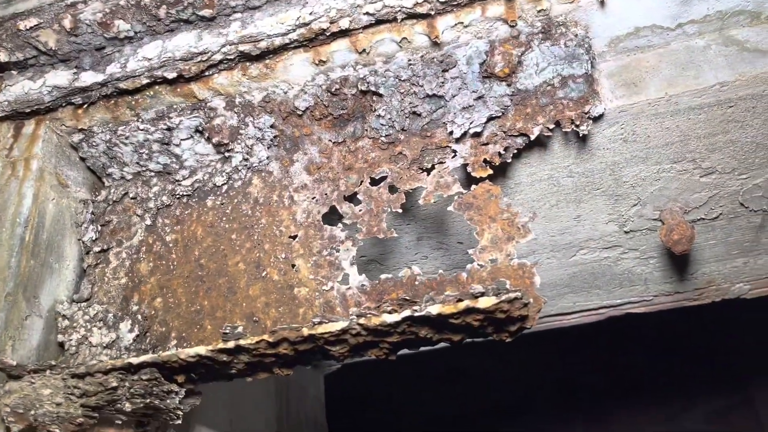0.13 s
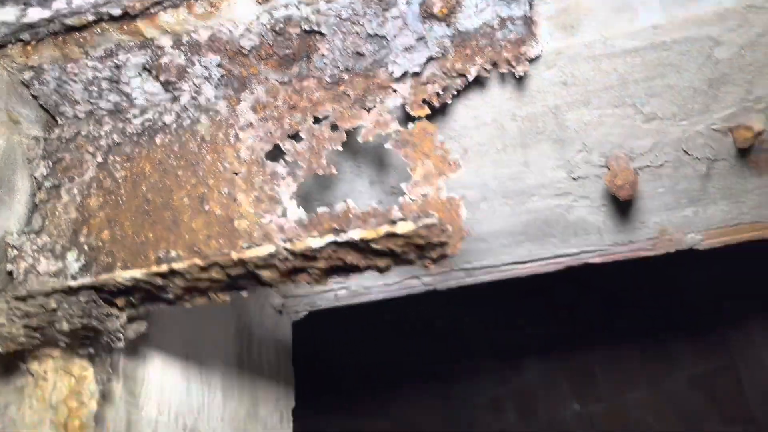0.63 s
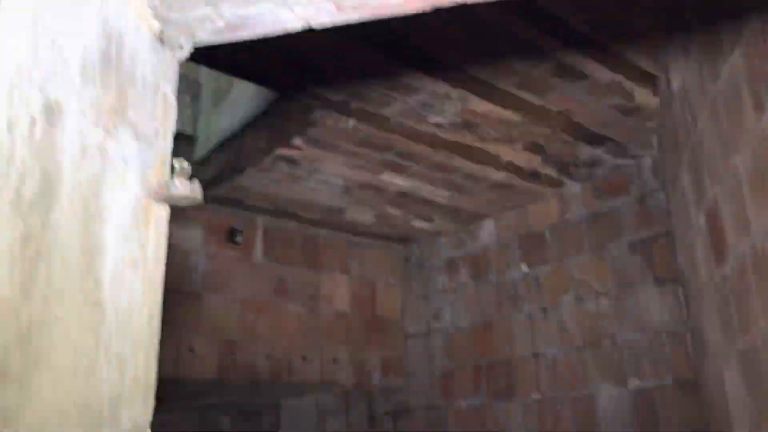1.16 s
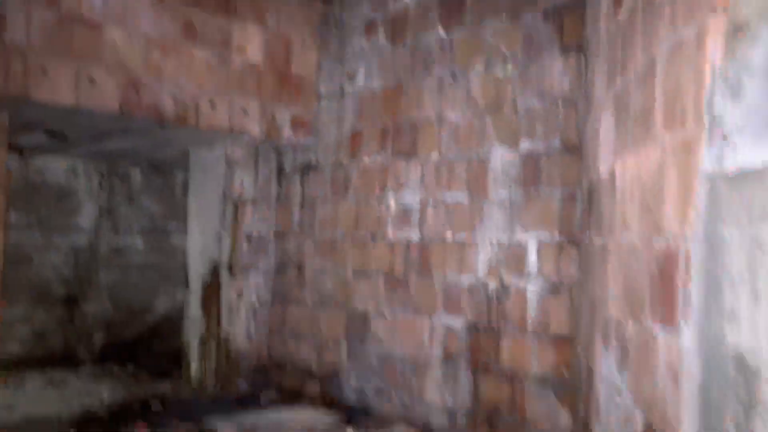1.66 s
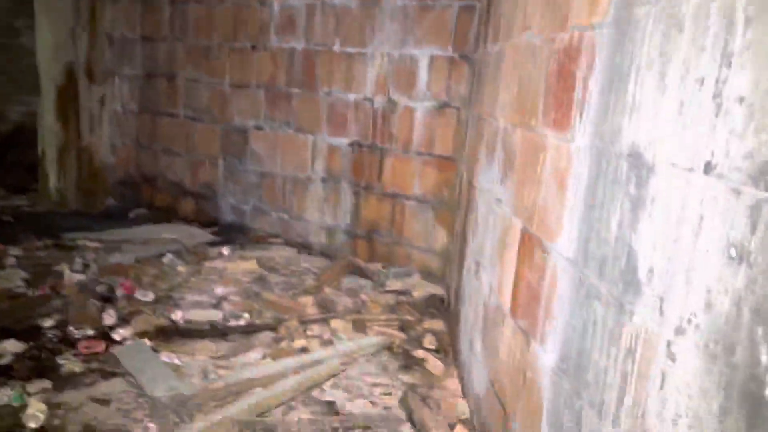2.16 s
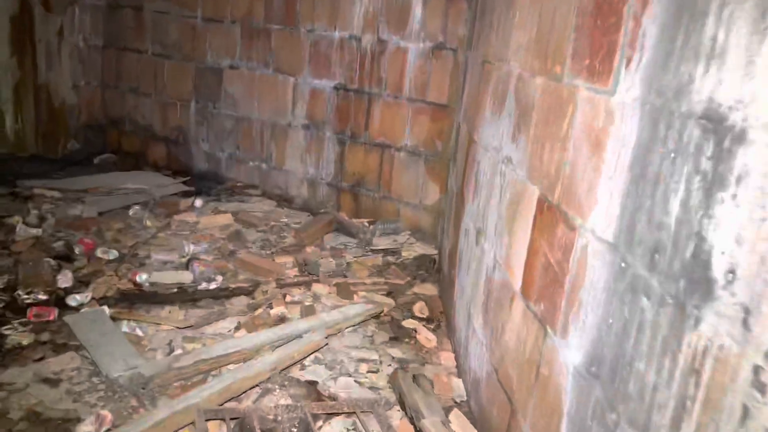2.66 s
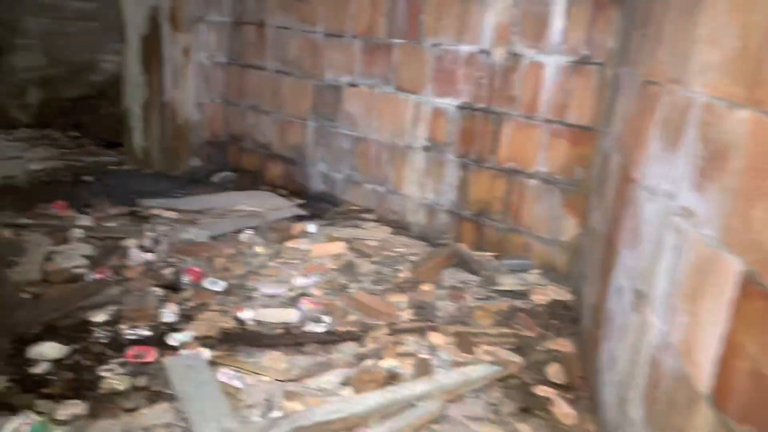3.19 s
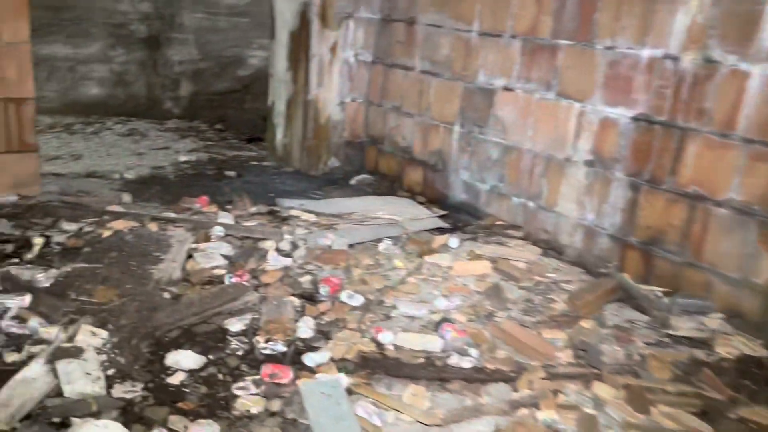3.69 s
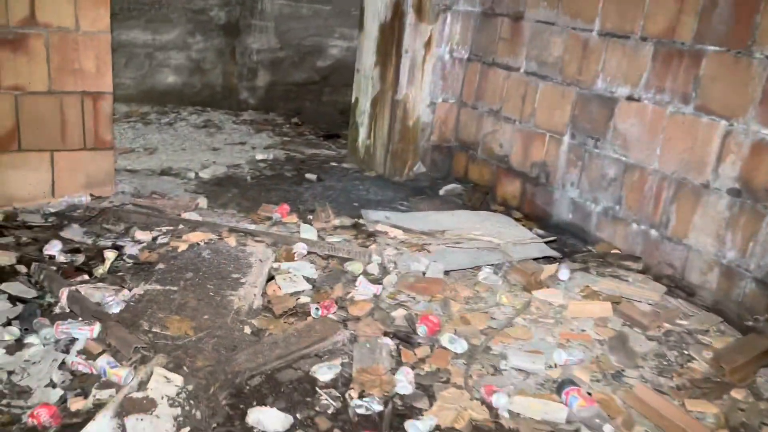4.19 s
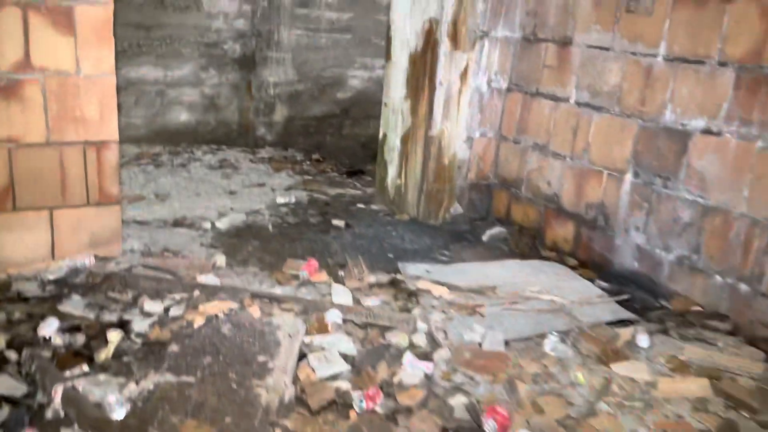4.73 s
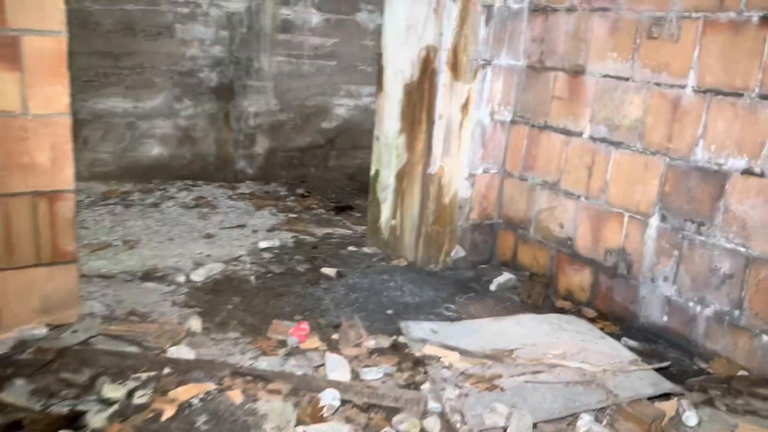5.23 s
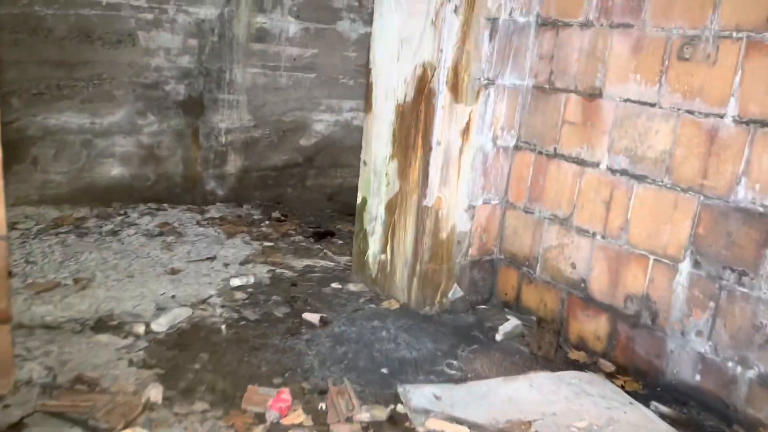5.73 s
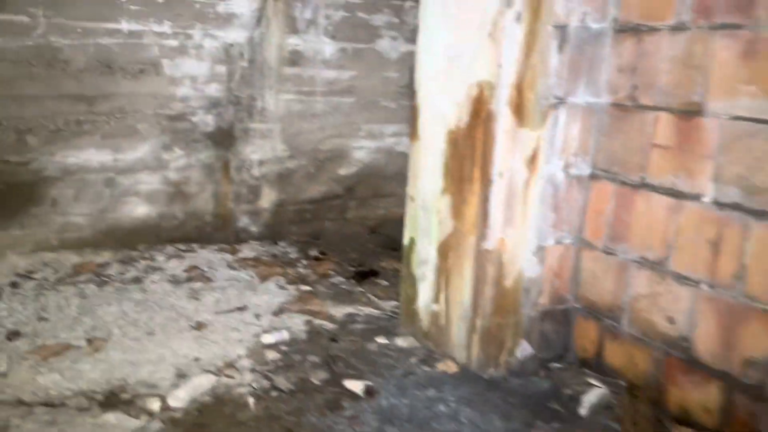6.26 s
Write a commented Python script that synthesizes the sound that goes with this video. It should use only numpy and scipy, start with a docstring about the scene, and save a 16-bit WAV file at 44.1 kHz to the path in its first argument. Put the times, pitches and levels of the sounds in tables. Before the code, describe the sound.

Near silence at first: a faint low rumble, a little hiss and a barely audible high whistle in an empty brick building. Cloth swishes softly, small grit stirs, then slow steps land on rubble, crunching sand and cracking brick shards. A kicked tile fragment clinks and bounces. The last steps are the crunchiest and loudest. Bare rooms answer briefly. Close handheld stereo microphone.

```python
"""A low rumble, a faint hiss and a faint wavering whistle come first, inside an empty brick building.
Then clothes swish and rustle, and someone walks slowly over rubble on the concrete floor.
Each footfall thuds, crunches grit and cracks brick shards; a kicked tile bounces, and the bare rooms ring on.
Shaped noise makes the air, cloth and grit; fading sine waves make the shards, tile, thuds and hand knocks.
Two close microphone ports on a small recorder held in the hand pick it all up in stereo."""
import sys
import numpy as np
from scipy import signal
from scipy.fft import rfft, irfft, next_fast_len
from scipy.io import wavfile
from scipy.ndimage import uniform_filter1d, map_coordinates

SR = 44100
rng = np.random.default_rng(int(sys.argv[2]) if len(sys.argv) > 2 else 0)


def undo_db(level):
    """Turn decibels back into plain size, where 20 dB means ten times bigger."""
    steps = np.asarray(level, float) / 20
    return 10 ** steps


def wrap_up_sound(samples):
    """Save the sound to the file named by the first command line argument, as 16-bit audio."""
    columns = np.atleast_2d(samples).T
    # keep every value between -1 and 1, then stretch to whole-number steps
    tamed = np.clip(columns, -1, 1)
    steps = np.round(tamed * 32767).astype(np.int16)
    wavfile.write(sys.argv[1], SR, steps)


N = 280989  # length in samples

# Rumble of the building over time: time_s, level_db (before wavering)
RUMBLE_LEVEL = [(0.0, -62), (0.3, -69.5), (1.44, -55), (1.49, -47.5), (1.61, -57.5), (2.75, -55.5),
                (2.8, -50), (3.65, -61.5), (3.78, -41), (4.47, -56), (4.65, -54), (5.25, -59.5),
                (5.29, -51), (5.98, -62), (6.05, -54), (6.37, -60)]
# Tone of the rumble: pitch_hz, level_db per Hz
RUMBLE_TONE = [(15, -33), (25, -12), (65, 6), (118, -3), (200, -16), (260, -68), (440, -120)]
# Dull late ringing of the building, which rises with the steps, and rustle of clothes:
# time_s, late_ringing_level_db, cloth_level_db (cloth before wavering)
AIR_LEVELS = [(0.0, -77.5, -89), (0.53, -77, -100), (1.15, -64, -67.5), (1.37, -63.5, -57.5),
              (1.52, -67.5, -57), (1.8, -65.5, -63), (2.03, -69.5, -78), (2.18, -54.5, -75),
              (2.71, -60, -58.5), (2.89, -44.5, -92), (3.2, -55.5, -74), (3.38, -59, -74),
              (3.55, -59.5, -71), (3.85, -71, -48), (4.03, -54, -58), (4.42, -60.5, -68),
              (4.68, -47, -55.5), (5.06, -58.5, -59.5), (5.29, -71, -71), (5.5, -57.5, -64),
              (5.75, -56.5, -58.5), (5.88, -66, -55.5), (6.03, -47, -36), (6.37, -57, -74)]
# Tone of the dull late ringing: pitch_hz, level_db per Hz
LATE_RINGING_TONE = [(120, -33), (220, 2), (500, -5), (1000, -14), (1800, -32)]
# Tone of the rustling clothes: pitch_hz, level_db per Hz
CLOTH_TONE = [(500, -52), (1000, 0.5), (1700, 1), (2300, -4), (3300, -7.5), (4200, -9), (5100, -6.5),
              (6200, -10), (8000, -11), (12000, -19), (16000, -17)]
# Tone of the steady hiss: pitch_hz, level_db per Hz
HISS_TONE = [(300, 8), (3000, -4.5), (8000, -8), (16000, -21)]
# Fabric swishing as the legs swing: time_s, level_db (before wavering)
SWISH_LEVEL = [(0, -100), (.4, -101), (.52, -81.5), (.66, -69.5), (.85, -69.5), (1.0, -62), (1.14, -69.5),
               (1.3, -66), (2.0, -85), (2.3, -62), (2.7, -63), (3.0, -57), (3.25, -58.5), (3.45, -60),
               (3.7, -57), (4.2, -79), (4.45, -59), (4.85, -53), (5.05, -59.5), (5.2, -84), (5.45, -44),
               (5.63, -47), (5.75, -54), (5.82, -44), (5.95, -59), (6.37, -79.5)]
# The narrow hollow band of the swish: pitch_hz, level_db per Hz
SWISH_TONE = [(850, -40), (1120, -9), (1270, 0), (1400, -3), (1500, -12), (1640, -8), (1780, -28),
              (2300, -45)]
# A faint whistle far away: time_s, pitch_hz, level_db (pitch and level before wavering)
WHISTLE_PATH = [(0, 3300, -98), (.1, 3370, -98), (.17, 3220, -106), (.23, 3150, -96), (.33, 3140, -95),
                (.42, 3200, -108), (.52, 3250, -98), (.62, 3240, -104), (.7, 3240, -120)]

# How long the rooms ring at each pitch: pitch_hz, time_to_fall_60_db_s
ROOM_DECAY = [(100, 1.87), (260, 0.4), (700, 0.58), (1800, 0.62), (5000, 0.32), (13000, 0.23)]
# How strongly the rooms ring, relative: pitch_hz, level_db
ROOM_TONE = [(100, 8), (300, -3), (1500, -5), (5000, 0), (13000, -3)]
# First echoes from near walls: delay_s (before random spread), level_db
WALL_ECHOES = [(.0032, -11), (.0095, -16.5), (.013, -11), (.018, -17.5)]

# Knocks of the hand on the recorder body: start_s, peak_db (before a shared gain), pitch_hz
HAND_KNOCKS = [(1.486, -39.5, 61.5), (1.538, -48, 51), (1.849, -50, 65)]
# Heel and sole meeting the slab: start_s, peak_db (before a shared gain and the slab), pitch_hz
FOOT_THUDS = [(2.06, -39, 338), (2.751, -40, 184), (2.802, -26.5, 201), (2.828, -21, 257),
              (3.217, -40, 232), (3.735, -32.5, 264), (3.778, -31, 282), (3.786, -27, 330),
              (3.7955, -21, 283), (4.149, -41.5, 184), (4.384, -47, 243), (4.508, -58, 163),
              (4.64, -38, 225), (5.265, -56, 246), (5.33, -49, 171), (5.977, -46, 208), (6.051, -37.5, 195),
              (6.341, -42, 252)]
# The stiff floor gives off little bass: pitch_hz, gain_db
SLAB_GAIN = [(50, -30), (100, -14), (170, 0)]
# Bounces of a kicked hard tile fragment: start_s, peak_db (before rattle), extra_db_above_3_khz
TILE_BOUNCES = [(4.5576, -15, -7.5), (4.5684, -15, 4), (4.584, -24, 2), (4.592, -24, 4), (4.602, -29, 2),
                (4.625, -33, 0)]
# Ringing tones of the tile: pitch_hz, level_db, time_to_fall_60_db_s
TILE_TONES = [(1760, 2.5, 0.071), (1834, 0, 0.095), (3170, -18, 0.087), (3770, -2, 0.1), (3950, 2.5, 0.098),
              (5470, -5, 0.13), (6100, -9, .06), (7150, 0, 0.074), (9920, 7.5, 0.11), (10800, -6, .04),
              (12150, -6, .04)]

# The sole crushing grit: peak_s, chips_level_db (before clumping), time_to_fade_20_db_s (5 ms at least),
# lumps_over_chips_db, sand_over_chips_db
CRUNCHES = [(0.655, -70.5, 0.6, 4, -5), (0.905, -62.5, 0.16, -1, 2.5), (1.03, -66, -0.5, -6, -6),
            (1.171, -55.5, 0, 3, 0.5), (1.237, -68, 0.27, 10.5, 4), (1.365, -57.5, 0.1, -16, -2.5),
            (1.45, -60.5, 0.5, -18, -7), (1.663, -48.5, 0.05, -3, -4), (1.721, -64.5, 0.2, 10.5, -1.5),
            (1.842, -65, 0.1, 7.5, -11), (2.046, -42, -0.04, 7, -6.5), (2.066, -50, 0.4, 2.5, -3),
            (2.1, -50.5, 0.1054, 7, 3.5), (2.14, -57, 0.4, -2, -1.5), (2.64, -66.5, 0.6, -10, -2.5),
            (2.732, -52, 0.35, 5, -3), (2.754, -30, 0.08, -3, -11), (2.804, -26, 0.06, -2, -17),
            (2.78, -49, 0, -7, -12), (2.837, -34, 0.0273, 5, -6), (2.9, -52.5, 0.08, -7, 3.5),
            (3.135, -58, 0.2, 0, -10), (3.22, -56, 0, -18, -3.5), (3.26, -61.5, 0.18, -5, -3.5),
            (3.6, -61, 1, -4.5, -4), (3.68, -49.5, -0.05, -5, 1.5), (3.737, -39.5, 0.16, 0.5, -6.5),
            (3.757, -39.5, 0.0626, 11, -8), (3.783, -40, 0.0662, 7, -18), (3.796, -35, 0.0145, 5.5, -3),
            (3.82, -57, 0.03, 10, -1), (3.9, -63.5, 0, 4, -6.5), (4.002, -40, -0.15, -11, -6),
            (4.149, -52, 0.15, 7.5, -7.5), (4.331, -67, 1.5, -25, 5.5), (4.388, -53, -0.01, 8, 7),
            (4.424, -54, 0.14, -4.5, -1), (4.47, -49, -1, -14, -17), (4.521, -49, 0.27, 6.5, -3.5),
            (4.537, -47, 0.19, 0, 1), (4.564, -43.5, -0.02, -6, 12), (4.573, -42, -0.03, -6, 15.5),
            (4.607, -38.5, 0.15, -2, 4), (4.634, -30.5, 0.0618, 0, -3), (4.654, -32, 0.12, 5.5, -7),
            (4.69, -57, 0.5, 9, -11), (5.251, -41, 0.1257, 4.5, 1.5), (5.263, -35, 0.16, 4, 1),
            (5.278, -33.5, 0.11, 0.5, -0.5), (5.303, -45, 0.18, -0.5, -10), (5.335, -35.5, 0.1, -1, 2),
            (5.358, -45, 0.11, 9, 6.5), (5.39, -55, 0.16, -12, -1), (5.472, -46, 0.17, 0, 2.5),
            (5.789, -50.5, 0.12, 4.5, -4), (5.871, -53.5, -0.1, -18, 3), (5.943, -55.5, 0.16, 7, 9.5),
            (5.996, -29, 0.15, -7, -3), (6.029, -48, 0.3, 0, -8), (6.072, -36.5, 0.09, 3, 5.5),
            (6.09, -38.5, 0.14, 1, 1), (6.11, -61, 0, 15, -3)]
# Tone of the chips: pitch_hz, level_db
CHIPS_TONE = [(600, 6.5), (950, 16.5), (1500, 16.5), (2100, 14.5), (3200, -35)]
# Tone of the lumps: pitch_hz, level_db
LUMPS_TONE = [(120, 7.5), (250, -4.5), (500, 3), (900, -1.5), (1400, -31.5)]
# Tone of the sand: pitch_hz, level_db
SAND_TONE = [(1500, -15.5), (2400, -7.5), (3400, -8.5), (5000, -9.5), (6200, -15), (8500, -24)]
# Tone of the dust: pitch_hz, level_db
DUST_TONE = [(4500, -67), (6500, -3.5), (9000, 4), (11000, -7), (14000, -30), (16500, -55)]

# Shards cracking: start_s, peak_db (before left-right spread), lowest_pitch_hz,
# upper_tones_db and snap_db (each relative, before a shared gain)
SHARD_CRACKS = [(0.892, -43.5, 1600, -5, -30), (1.031, -48, 1190, -3, -35), (1.162, -48.5, 690, -5, -33),
                (1.233, -35.5, 670, -1, 4), (1.659, -28, 1700, -8.5, -34), (1.892, -51, 820, -1, -38),
                (2.044, -30, 816, -33, -16.5), (2.086, -31, 1050, -28, -24), (2.103, -21, 900, -23, -5.5),
                (2.268, -32, 1220, -19, -20), (2.504, -38.5, 1300, -3, -7), (2.651, -39.5, 920, -30, -16),
                (2.666, -36, 1120, -20, -17), (2.722, -28, 1090, -15, -2), (2.752, -21, 1090, -30, -24),
                (2.7665, -26.5, 920, -17, -30), (2.7975, -8.5, 806, -16, -22.5),
                (2.801, -12, 1086, -12.5, -21), (2.8155, -32, 890, -19, -30), (2.83, -23, 900, -15, 6),
                (2.879, -30, 1230, 0, -9), (2.984, -28, 1220, -28, -47), (3.121, -39, 990, -14.5, -32.5),
                (3.1345, -35, 1000, -7.5, -42), (3.175, -44, 1250, -2, -32), (3.197, -35, 1210, -4.5, -22),
                (3.2145, -30.5, 1180, -6.5, -34), (3.308, -47, 1110, -8, -33), (3.466, -50, 1320, -28, -40),
                (3.513, -47.5, 1450, -22, -48), (3.573, -46, 1400, -4, -33), (3.602, -47, 1160, -3, -24),
                (3.621, -39, 1060, -4, -19), (3.64, -52, 1480, -8, -30), (3.676, -33, 2730, -32, -48),
                (3.73, -25.5, 884, -4, -19), (3.747, -31, 895, 2, -15), (3.757, -25, 905, 5, -33),
                (3.797, -27, 670, 7, -28), (3.893, -31, 1880, 0.5, -15), (3.939, -39, 575, -10, -19),
                (3.968, -31.5, 987, -2.5, -17), (4.004, -29, 790, 1, -18.5), (4.107, -45, 1500, 0, 3),
                (4.136, -38, 480, 6, -37), (4.239, -37, 1130, -5, -15), (4.305, -39, 1300, -4, 0),
                (4.328, -31.5, 2010, -3, -4), (4.382, -35.5, 545, -5, -28), (4.415, -38, 544, -5, -15),
                (4.446, -35, 1700, -14, -19), (4.509, -40, 493, -26, -42), (4.526, -30, 900, -3, -13),
                (4.544, -34, 1100, -3, -15), (4.775, -32.5, 826, -34, -35), (5.144, -38.5, 1340, 8, 15),
                (5.174, -38, 1350, -20, -11), (5.209, -42, 1200, -10, -13), (5.247, -19.5, 1420, -32, -13),
                (5.268, -20, 783, -6, -11), (5.278, -14.5, 1300, -16, -11), (5.3185, -4.5, 1022, -2.5, -4),
                (5.3315, -9, 1490, 0, 8), (5.344, -20, 1070, -19, -16), (5.359, -13, 896, -6, -13.5),
                (5.378, -18.5, 1490, 8, -13), (5.465, -17.5, 1230, -14, -15.5),
                (5.516, -18.5, 1400, -22, 5), (5.782, -28, 1450, -39, -27.5), (5.784, -26.5, 974, -33, -24),
                (5.863, -12.5, 1030, -10.5, 6), (5.875, -29, 1500, 2.5, -2), (5.936, -22.5, 1234, -12, -7),
                (5.979, -3, 1463, -11, -16.5), (5.9925, -19, 1570, -2, -29), (6.066, -14, 1000, 3, 7),
                (6.104, -21, 1270, 3, -19)]
# Ringing tones of a shard: multiple_of_lowest_pitch, level_db, time_to_fall_60_db in own cycles
SHARD_TONES = [(0.998, 4.5, 11.3), (1.452, -6, 18), (1.9, -1, 14), (2.3, 1.5, 12.5), (2.8, 0, 16.7),
               (3.5, -0.5, 21), (4.3, -3.5, 13.4), (5.2, -6.5, 16.4)]

# Sound not shared by the two ports: pitch_hz, gain_db
STEREO_WIDTH = [(60, -16.5), (250, -6.5), (700, 3), (1500, -1.7), (4000, 4.5), (6500, -8.5), (7900, -36),
                (9200, -32), (10500, -6), (12000, -8), (15000, -35)]
# How far the left port leads the right: pitch_hz, lead_radians
LEFT_LEAD = [(300, 0), (1200, 1), (3600, 1.2), (5600, -.8), (6600, -1.4), (7750, -3.05), (9350, -3.3),
             (10700, -6.15), (13200, -6.35), (14600, -9.4)]
# Left port level minus right: pitch_hz, difference_db
LEFT_MINUS_RIGHT = [(900, 1), (1400, -2), (2200, 2.5), (5000, 6), (7300, 6), (7900, 2.5), (9300, 3.5),
                    (10000, 2.5), (15000, -3)]
# What the microphones let through: pitch_hz, gain_db
MIC_GAIN = [(20, -35), (40, 2.5), (70, -0.34), (9000, -1.3), (13000, -5.5), (14200, -14), (15200, -9),
            (16400, -15)]

SPREAD_DB = 5.5  # typical left-right level difference of a shard
SOFT_CYCLES = 0.69  # the low tones of a shard swell over about this many swings
# Small shards tick at random between the listed cracks, following the rustle of movement
TICKS_PER_S, TICK_HZ = 8, 1300  # TICK_HZ: middle value of the lowest pitch
TICK_OVER_CLOTH_DB, TICK_SCATTER_DB, TICK_UPPER_DB, TICK_SNAP_DB = 7.5, 0.5, -6, -20
RISE_S, RISE_SHARE = 0.0062, 0.088  # crunch swells by 20 dB in a least time plus a share of the fade
# Dust over sand when the sand level is HARD_DB; each dB below takes off DUST_GROWS dB
DUST_DB, DUST_GROWS, HARD_DB = -2.5, 0.38, -39


def unit(x):
    """Scales a sound to an rms of 1."""
    return x / np.sqrt(np.mean(x ** 2) + 1e-20)


def peak_one(x):
    """Scales a sound to a peak of 1."""
    return x / np.abs(x).max()


def along(points, hz):
    """Reads a value between (pitch, value) points, on a log pitch axis."""
    f, v = np.transpose(points)
    return np.interp(np.log(hz + 1), np.log(f + 1), v)


def curves(rows):
    """Draws straight lines between timed rows: one curve for each column after the time."""
    s, *columns = np.transpose(rows)
    return [np.interp(np.arange(N) / SR, s, column) for column in columns]


def wobble(rate):
    """Draws a smooth random curve with rate random points a second."""
    knots = rng.standard_normal(int(N * rate / SR) + 4)
    return map_coordinates(knots, [np.arange(N) * rate / SR])


def filtered(x, response):
    """Changes the strength and phase of each pitch by a response."""
    m = next_fast_len(N + 8192)
    return irfft(rfft(x, m) * response(np.fft.rfftfreq(m, 1 / SR)), m)[..., :N]


def coloured(x, spectrum):
    """Shapes a sound's tone by (pitch, dB) points, then scales it to rms 1."""
    return unit(filtered(x, lambda hz: undo_db(along(spectrum, hz))))


def add(track, s, sound):
    """Lays a sound into a track at s seconds."""
    at = max(round(s * SR), 0)
    track[..., at:at + sound.shape[-1]] += sound[..., :N - at]


def grains(per_s, spread_db, smooth):
    """Scatters random clicks of unequal size over a share of smooth noise."""
    size_db = spread_db * np.minimum(rng.exponential(size=N), 3)
    clicks = (rng.random(N) < per_s / SR) * undo_db(size_db) * rng.standard_normal(N)
    return unit(clicks) + smooth * rng.standard_normal(N)


def patchy(x, depth_db, size):
    """Makes random patches louder or softer in time and pitch, so each piece has its own colour."""
    z = signal.stft(x, nperseg=size)[2]
    field = rng.standard_normal(z.shape[-2:])
    field = uniform_filter1d(field, size=3, axis=0)
    field = uniform_filter1d(field, size=3, axis=1)
    gain = unit(undo_db(depth_db * unit(field)))
    return signal.istft(z * gain, nperseg=size)[1][..., :N]


def shaped_noise(spectrum):
    """Stereo noise with a given tone, independent left and right."""
    return coloured(rng.standard_normal((2, N)), spectrum)


def rumble(level_db):
    """The building's low rumble: bass noise whose level wavers in lumps."""
    return undo_db(level_db + 0.88 * wobble(17) + 1.8 * wobble(23)) * shaped_noise(RUMBLE_TONE)


def rustle(level_db):
    """Clothes rubbing: many tiny slips over smooth noise, uneven in level and colour."""
    rub = np.array([grains(1500, spread_db=3.0, smooth=0.84) for _ in range(2)])
    cloth = patchy(coloured(rub, CLOTH_TONE), depth_db=2.5, size=1024)
    return undo_db(level_db + 1.5 * wobble(14) + 1.5 * wobble(60)) * cloth


def swish():
    """Rubbing fabric excites one hollow resonance in uneven puffs."""
    rub = np.array([grains(600, spread_db=1.0, smooth=1.2) for _ in range(2)])
    level_db = curves(SWISH_LEVEL)[0] + 3.0 * wobble(22) + 1.1 * wobble(87)
    return undo_db(level_db) * coloured(rub, SWISH_TONE)


def whistle():
    """One sine tone, unsteady in pitch and level."""
    hz, db = curves(WHISTLE_PATH)
    phase = 2 * np.pi * np.cumsum(hz + 25 * wobble(40)) / SR
    return np.sqrt(2) * undo_db(db + 4 * wobble(30)) * np.sin(phase)


def background():
    """Adds the rumble, dull late ringing of the building, moving clothes, faint hiss and whistle."""
    rumble_db = curves(RUMBLE_LEVEL)[0]
    late_db, cloth_db = curves(AIR_LEVELS)
    late_ringing = undo_db(late_db) * shaped_noise(LATE_RINGING_TONE)
    hiss = undo_db(-82.0) * shaped_noise(HISS_TONE)
    return rumble(rumble_db) + late_ringing + rustle(cloth_db) + hiss + swish() + whistle()


def room(x):
    """Near walls answer first, then a tail that dies by pitch; a new random tail is drawn each quarter second."""
    out, piece = np.zeros((2, N)), SR // 4
    for at in range(0, N, piece):
        hz, t, z = signal.stft(rng.standard_normal((2, SR)), SR, nperseg=256)
        t60 = along(ROOM_DECAY, hz)[:, None]
        tail_db = along(ROOM_TONE, hz)[:, None] - 60 * t / t60
        tail = signal.istft(z * undo_db(tail_db) / np.sqrt(t60), SR, nperseg=256)[1]
        # silent for 7.7 ms, then fades in over another 7.7 ms
        tail *= .018 * np.clip(np.arange(tail.shape[1]) / SR / 0.0077 - 1, 0, 1)
        for s, db in WALL_ECHOES:
            delay = (s * SR * rng.uniform(.85, 1.15, 2)).astype(int)  # differs left and right
            tail[[0, 1], delay] += undo_db(db)
        add(out, at / SR, signal.fftconvolve(x[None, at:at + piece], tail, axes=1))
    return out


def pushes(events, cycles, gain_db):
    """Soft contacts: a few low swings that start gently and die away."""
    out, t = np.zeros(N), np.arange(SR // 4) / SR
    for s, db, hz in events:
        swell = (hz * t) * np.exp(1 - hz * t / cycles) / cycles  # largest after the given cycles
        add(out, s, undo_db(db + gain_db) * np.sin(2 * np.pi * hz * t) * swell)
    return out


def tile():
    """Each bounce rings the same tones at new strengths, roughened by rattling on the grit."""
    out, t = np.zeros(N), np.arange(SR // 4) / SR
    for s, db, upper_db in TILE_BOUNCES:
        ring = np.zeros(len(t))
        for hz, level_db, t60 in TILE_TONES:
            tone_db = level_db + upper_db * (hz > 3000) + rng.normal(0, 1.5)
            ring += undo_db(tone_db - 60 * t / t60) * np.sin(2 * np.pi * hz * t)
        add(out, s, undo_db(db) * peak_one(ring))
    return out * undo_db(3 * wobble(150))


def crunch():
    """Debris of four sizes breaks in clumps as weight rolls over it: each crunch swells fast and fades."""
    power, t = np.zeros((4, N)), np.arange(-SR // 4, SR) / SR  # t = 0 at the peak
    for peak_s, db, fade_s, lumps_db, sand_db in CRUNCHES:
        fade_s = max(fade_s, .005)
        rise_db = -20 * np.abs(t / (RISE_S + RISE_SHARE * fade_s)) ** 1.65
        shape = undo_db(np.where(t < 0, rise_db, -20 * t / fade_s))
        # lighter crunches raise less dust
        dust_db = sand_db + DUST_DB + DUST_GROWS * (db + sand_db - HARD_DB)
        sizes_db = db + np.array([[0], [lumps_db], [sand_db], [dust_db]])
        add(power, peak_s + t[0], (undo_db(sizes_db) * shape) ** 2)
    shared_db = 1.2 * wobble(30) + .9 * wobble(120)
    own_db = 2.2 * np.array([wobble(45) for _ in power])  # one curve for each size
    clumps = unit(undo_db(shared_db + own_db))
    layers = [coloured(grains(1500, spread_db=1.8, smooth=0.9), CHIPS_TONE),
              coloured(grains(700, spread_db=0.0, smooth=0.36), LUMPS_TONE),
              coloured(grains(3000, spread_db=2.2, smooth=0.9), SAND_TONE),
              coloured(grains(5000, spread_db=1, smooth=.9), DUST_TONE)]
    return patchy((np.sqrt(power) * layers * clumps).sum(0), depth_db=3.5, size=256)


def ticks():
    """Draws small cracks by chance, as rows like those of SHARD_CRACKS, louder when clothes rustle more."""
    count = int(TICKS_PER_S * N / SR)
    luck = rng.standard_normal((count, 3))
    s = (np.arange(count) + rng.random(count)) / TICKS_PER_S
    when, _, movement_db = np.transpose(AIR_LEVELS)
    db = np.interp(s, when, movement_db) + TICK_OVER_CLOTH_DB + TICK_SCATTER_DB * luck[:, 0]
    hz = TICK_HZ * np.exp(0.39 * luck[:, 1])
    upper_db = TICK_UPPER_DB + 6 * luck[:, 2]
    return np.transpose([s, db, hz, upper_db, np.full(count, TICK_SNAP_DB)])


def cracks():
    """A shard snaps with a click and rings for a few cycles in its low and upper tones."""
    out, t = np.zeros((2, N)), np.arange(SR // 20) / SR
    multiple, tone_db, cycles = np.transpose(SHARD_TONES)[..., None]
    upper = multiple[:, 0] > 1.7
    onset = 1 - np.exp(-t / 0.00031)
    rows = np.vstack([SHARD_CRACKS, ticks()])
    all_luck = rng.standard_normal((len(rows), 3, len(SHARD_TONES), 1))
    for (s, db, hz, upper_db, snap_db), luck in zip(rows, all_luck):
        pan_db = SPREAD_DB * luck[2, 0, 0]
        ring_hz = hz * multiple * (1 + .04 * (multiple > 1) * luck[1])  # no two shards alike
        ring_db = tone_db + 2.5 * luck[0] - 60 * t * ring_hz / cycles
        rings = undo_db(ring_db) * np.sin(2 * np.pi * ring_hz * t)
        soft_onset = (1 - np.exp(-t * hz / SOFT_CYCLES)) ** 2
        low_ring = peak_one(soft_onset * rings[~upper].sum(0))
        upper_ring = peak_one(onset * rings[upper].sum(0))
        noise = np.diff(rng.standard_normal(len(t) + 1))  # differences make it bright
        snap = peak_one(onset * undo_db(-60 * t / 0.0083) * noise)
        sound = low_ring + undo_db(upper_db + 7.5) * upper_ring + undo_db(snap_db + 16.5) * snap
        add(out, s, undo_db(db) * peak_one(sound) * undo_db([[pan_db / 2], [-pan_db / 2]]))
    return out


def scene():
    """Adds the steps close below, their room, the hand on the recorder and the background."""
    shards = cracks()
    floor = crunch() + tile() + pushes(FOOT_THUDS, cycles=0.93, gain_db=-1.0)
    floor = filtered(floor, lambda hz: undo_db(along(SLAB_GAIN, hz)))
    echo = room(undo_db(0.5) * shards.mean(0) + floor)
    hand = pushes(HAND_KNOCKS, cycles=0.54, gain_db=4.5)
    return shards + floor + echo + hand + background()


def top_cut(x):
    """Nothing passes above the cut-off."""
    return signal.sosfilt(signal.butter(12, 16480, fs=SR, output="sos"), x)


def record(dry):
    """Two close microphone ports share most of the sound, with a lead between them that turns with pitch."""
    mid = (dry[0] + dry[1]) / 2
    side = filtered((dry[0] - dry[1]) / 2, lambda hz: undo_db(along(STEREO_WIDTH, hz)))

    def tilt(hz):
        """Half the level and phase difference; the right port gets the opposite half."""
        return undo_db(along(LEFT_MINUS_RIGHT, hz) / 2) * np.exp(1j * along(LEFT_LEAD, hz) / 2)

    def response(hz):
        """Microphone gain with the left and right tilt."""
        return undo_db(along(MIC_GAIN, hz)) * [tilt(hz), 1 / tilt(hz)]

    ports = filtered(np.array([mid + side, mid - side]), response)
    return top_cut(ports)


dry = scene()
out = record(dry)
wrap_up_sound(out)
```